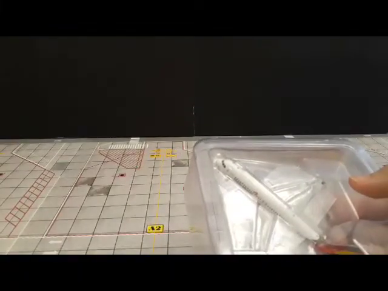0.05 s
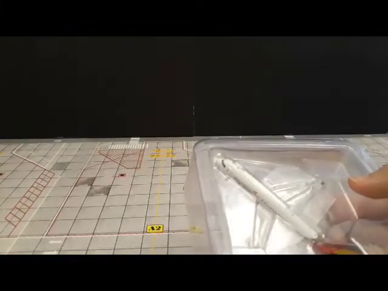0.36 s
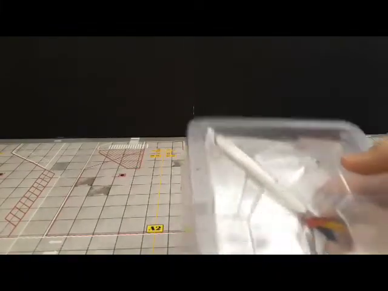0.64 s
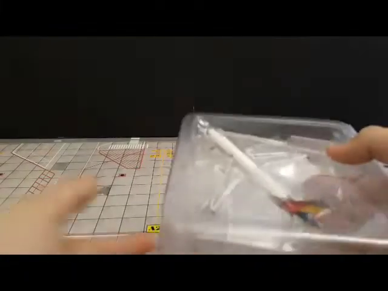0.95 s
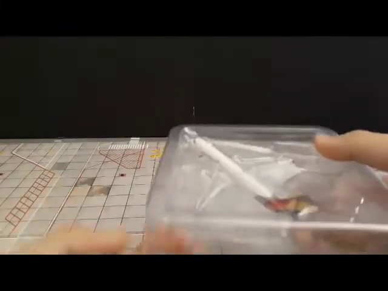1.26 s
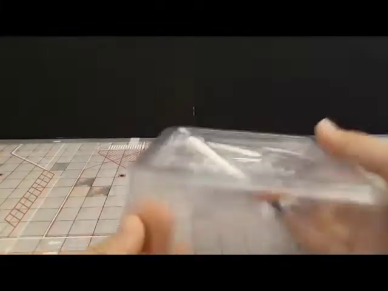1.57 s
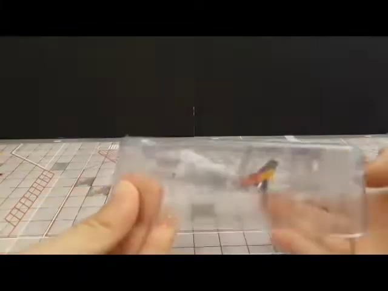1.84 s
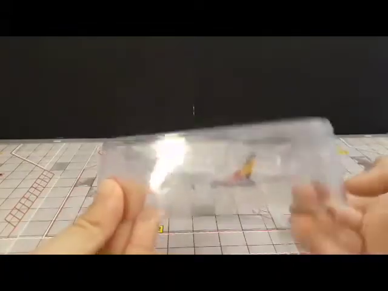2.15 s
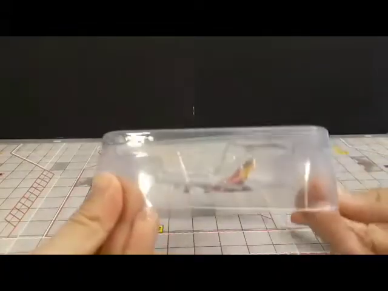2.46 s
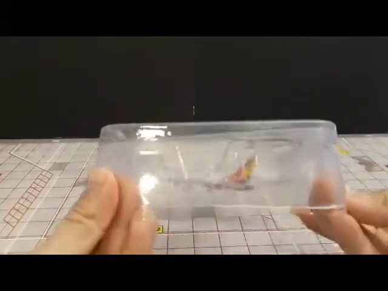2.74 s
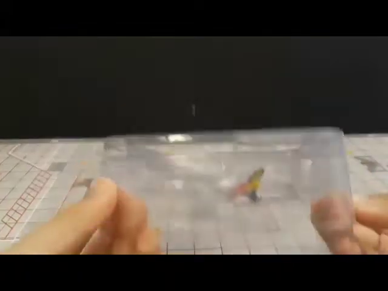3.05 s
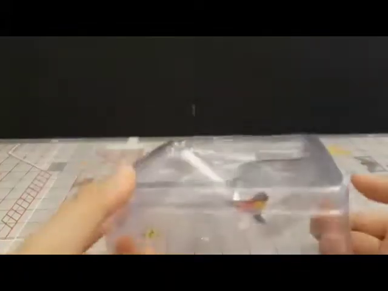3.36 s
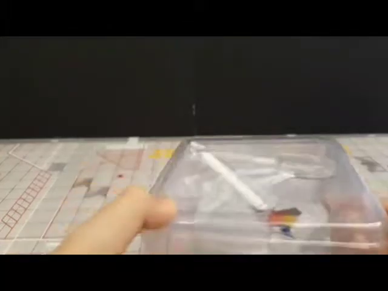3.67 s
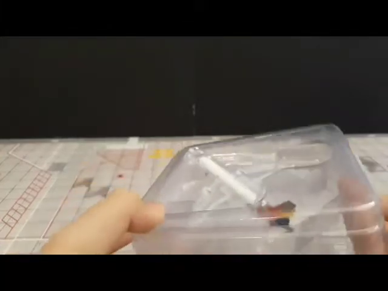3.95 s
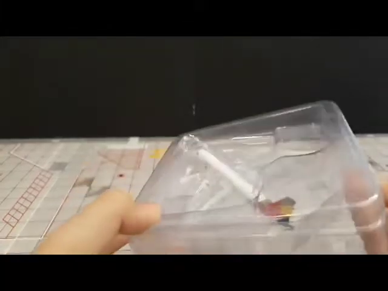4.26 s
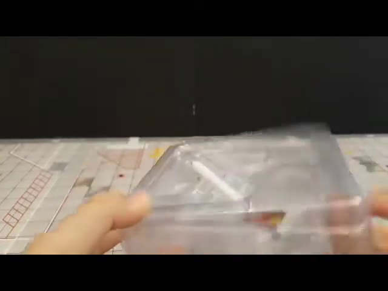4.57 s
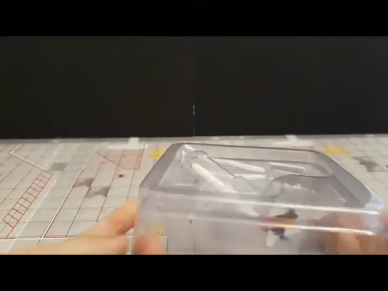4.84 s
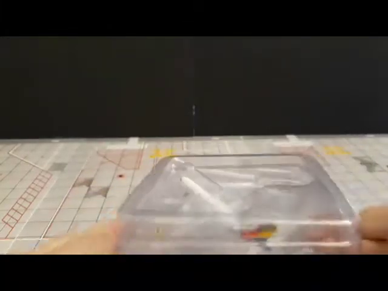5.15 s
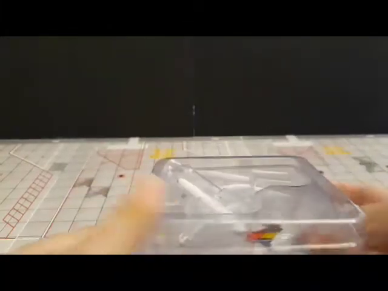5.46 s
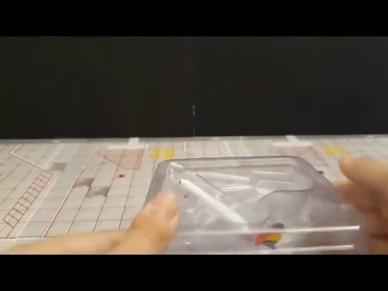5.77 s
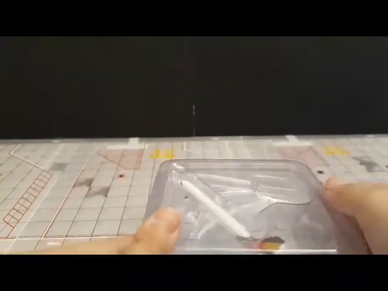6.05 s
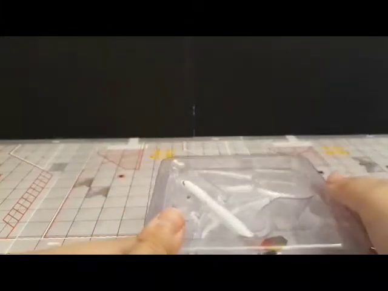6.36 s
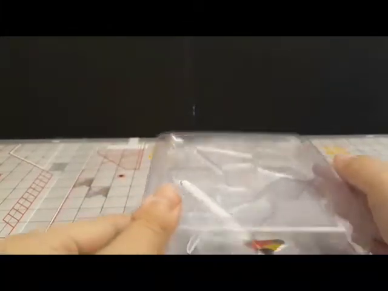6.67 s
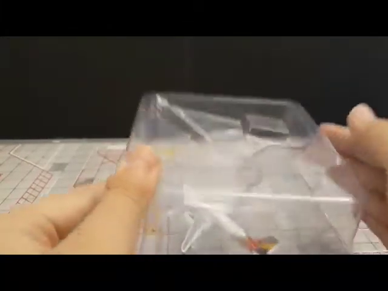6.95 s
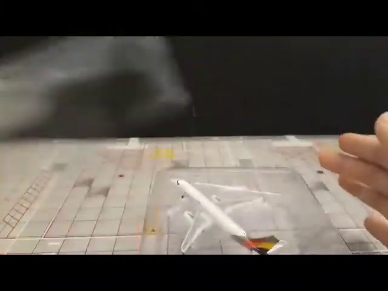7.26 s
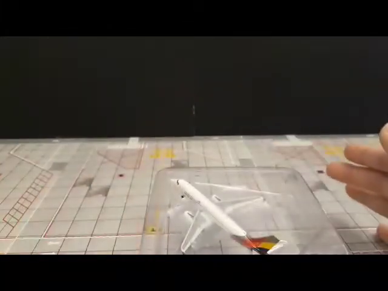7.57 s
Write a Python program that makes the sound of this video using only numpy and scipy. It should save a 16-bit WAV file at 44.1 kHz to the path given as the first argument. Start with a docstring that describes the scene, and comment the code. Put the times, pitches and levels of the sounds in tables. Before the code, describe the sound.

A thin plastic tray is handled close to the microphone, over faint room noise and a low hum, with a brief small-room echo. For the first 1.5 seconds there are light clicks, soft sliding hisses and faint, thin whistles. Sharper dry snaps come at about 1.6, 1.9 and 2.3 seconds. Near 2.9 seconds a loud cluster of cracks rings briefly as the rim springs free. Smaller crackles follow around 3.5 seconds, then scattered clicks and short scrapes from 4 to 5 seconds. From 5.2 seconds the two halves catch and slip in busier scrapes, snaps and hisses, peaking in loud, hollow cracks just after 6 seconds. A last run of scraping and snapping comes around 6.7 to 6.9 seconds. The lid slides off with a soft hiss from 7.1 to 7.5 seconds, leaving only the hum.

```python
"""First comes a low room noise with a faint hum, then the dry snaps of a plastic tray bent by hand.
Its thin walls snap as they buckle, and stiff parts spring free and ring. Between the snaps come soft
sliding hisses and faint, thin, high whistles. As the two halves are pulled apart, they catch and
slip in short scrapes. The desk and the walls of the small room add a brief echo."""
import sys
import numpy as np
from scipy import signal
from scipy.fft import rfft, irfft
from scipy.io import wavfile
from scipy.ndimage import uniform_filter1d

SR = 44100
rng = np.random.default_rng(int(sys.argv[2]) if len(sys.argv) > 2 else 0)


def inscribe(sig):
    """Save sig as 16-bit PCM at rate SR to the path in sys.argv[1].

    A 1-D sig is mono; a 2-D sig holds one channel per row.
    Samples are clipped to [-1, 1] before scaling.
    """
    pcm = np.round(np.clip(np.atleast_2d(sig).T, -1, 1) * 32767)
    wavfile.write(sys.argv[1], SR, pcm.astype(np.int16))


N = 344421


def from_db(db):
    """Turn decibels into a number to multiply a sound by."""
    return 10 ** (np.asarray(db) / 20)


def rms_one(x):
    """Scale a sound so that its average size (rms) is one."""
    return x / np.sqrt(np.mean(x ** 2) + 1e-20)


def at_hz(points, hz):
    """Read between the rows of a table, with pitch counted in octaves."""
    pitches, values = np.transpose(points)
    return np.interp(np.log(np.maximum(hz, 1)), np.log(pitches), values)


def band_pass(low_hz, high_hz):
    """A gentle filter that keeps the sound between two pitches."""
    return signal.butter(2, [low_hz, high_hz], "band", fs=SR, output="sos")


def add(track, start, sound):
    """Mix a sound into the track, starting at a time in seconds."""
    i = max(round(start * SR), 0)
    part = sound[:max(N - i, 0)]
    track[i:i + len(part)] += part


# The tone of the room noise: (pitch [Hz], relative level [dB])
ROOM_NOISE = [(15, -41), (25, -31), (49, -5.5), (122, -2), (148, -3.5), (193, -1.5), (359, -5),
              (582, -12.5), (631, -11.5), (684, -15.5), (871, -17), (1380, -20), (2060, -20.5), (7910, -31),
              (15500, -31.5)]
# The noise that differs between left and right: (pitch [Hz], level against the shared noise [dB])
SIDE_NOISE = [(60, -35), (110, -26), (200, -27.5), (380, -21.5), (700, -12.5), (1290, -9.5), (2380, -8.5),
              (4400, -7), (8120, -15), (15000, -2)]
# The steady tones of the hum: (pitch [Hz], level [dB])
HUM_TONES = [(59.5, -78.5), (119, -73), (188.4, -87), (242, -75), (360.5, -75)]

def background(noise_db=-62.5):
    """Both ears share a low room noise and a mains hum; a thin hiss differs between them."""
    hz, t = np.arange(N // 2 + 1) * SR / N, np.arange(N) / SR
    shared, side = rfft(rng.standard_normal((2, N))) * from_db(at_hz(ROOM_NOISE, hz))
    side = irfft(side * from_db(at_hz(SIDE_NOISE, hz)), N)
    noise = from_db(noise_db) * rms_one(irfft(shared, N) + side * np.array([[1], [-1]]))
    hum = sum(from_db(db) * np.sin(2 * np.pi * (f * t + rng.random())) for f, db in HUM_TONES)
    return noise + np.sqrt(2) * hum


# The tray's own notes; fade time is how long a 60 dB drop takes:
# (pitch [Hz], relative level [dB], fade time [s])
TRAY_NOTES = [(183, -11, 0.038), (297, -7.5, 0.045), (343, -9.5, 0.021), (558, -4, 0.017),
              (743.5, -1.5, 0.028), (866, -3.5, 0.049), (1139, 0.5, 0.017), (1352, -6, 0.025),
              (1803, -0.5, 0.011), (2400, -7.5, 0.022), (2950, -1, 0.0031), (4340, -9, 0.0018),
              (6400, -11, 0.0067), (8500, -6.5, 0.0016), (9700, -19, 0.00053)]

def tray(force, spread_db, detune, click_db, blur_db=1.0, blur_fade_s=0.017, blur_top_hz=6000):
    """A push makes the tray ring; each touch and grip shifts the level and pitch of its notes a bit."""
    t = np.arange(SR // 20) / SR
    hz, db, fade_s = np.transpose(TRAY_NOTES)[:, :, None]
    strength, bend, direction = rng.standard_normal((3, len(TRAY_NOTES), 1))
    fade = from_db(db + spread_db * strength - 60 * t / fade_s)
    notes = np.sign(direction) * fade * np.sin(2 * np.pi * hz * (1 + detune * bend) * t)
    # countless weak notes of the ribbed walls blur into a short noisy tail
    blur = from_db(blur_db - 60 * t / blur_fade_s) * rng.standard_normal(len(t))
    blur[0] += from_db(click_db)  # the bare click of the touch
    soften = signal.butter(1, blur_top_hz, fs=SR, output="sos")
    return signal.fftconvolve(force, notes.sum(axis=0) + signal.sosfilt(soften, blur))


# The borders of five pitch bands, called thump, body, clack, crack and fizz: (pitch [Hz])
BAND_EDGES = [130, 500, 1400, 3200, 7500, 14000]

def shape_tone(sound, tone_db, touch, main_part, pivot_hz=1450, wall_hz=2010, wall_octaves=1.02):
    """Set the five band levels: a sharp touch adds treble, one near a flat wall's middle adds clack."""
    strength_db, brightness, clack_db = touch
    out = 0
    for k, (low, high) in enumerate(zip(BAND_EDGES, BAND_EDGES[1:])):
        hz = np.sqrt(low * high)
        wall = np.exp(-(np.log2(hz / wall_hz) / wall_octaves) ** 2)
        db = tone_db[k] + strength_db + brightness * np.log2(hz / pivot_hz) + clack_db * wall
        band = signal.sosfilt(band_pass(low, high), sound)
        size = np.sqrt(np.mean(band[main_part] ** 2) + 1e-20)
        out = out + (-1) ** k * band * from_db(db) / size  # flip every other band so they join up
    return out


# The tone all snaps share, one value a band from thump to fizz: (relative level [dB])
SNAP_TONE = [-6.5, -1.75, -5, -11, -14.5]
# Each time a wall buckles: (time [s], strength [dB], brightness [dB per octave], wall clack [dB])
BUCKLES = [(0.3546, -54.5, -1.7, 1.0), (0.8196, -59, 1, 2), (0.9117, -70.5, 4.5, 6.5),
           (1.0845, -66, 6.5, 7), (1.0935, -64, 5, 12.0), (1.1115, -57, 1, 3.0), (1.271, -61, -1.5, 3),
           (1.4262, -54.5, 1.4, -7.5), (1.4952, -53.5, -2, 4), (1.6231, -43, -0.7, -0.5),
           (1.633, -54.4, -2.8, 2), (1.6571, -57, -2.5, -1), (1.9, -39, 0.5, -10.5),
           (1.9646, -57.5, -1, 1.0), (1.9786, -57, -2, 6), (2.122, -60, 1, 1.0), (2.3075, -52.5, 0.5, -9.0),
           (2.318, -38.5, -1.8, 1), (2.328, -56, -1.5, 3), (2.4403, -62, -1.2, 3.0), (2.6385, -52, -1, -3),
           (2.7634, -53.5, -2, -0.0), (2.8508, -33.4, -1.5, 9.5), (2.8605, -40.5, 1, 10.5),
           (2.8775, -35.7, -1.5, -3), (2.8815, -39.0, -2.2, 2), (2.9246, -32.6, 0, -12),
           (2.929, -37, -3.3, -14), (2.9363, -37, -1.6, 13.5), (3.0854, -47.5, 0.4, 9.5),
           (3.1163, -52.5, 0, 0), (3.1324, -51.5, 0.2, -7), (3.1439, -49.5, 0.3, -9),
           (3.2002, -53.5, 0, -5.0), (3.2107, -55.5, 0.8, 0), (3.4553, -42.5, 2.5, -5),
           (3.4705, -43.5, 2.2, -6), (3.4805, -43.5, 1, -7), (3.4939, -48.5, 3, -2), (3.5332, -54, -1.7, 7),
           (3.5615, -48, -0.1, 3.5), (3.6384, -50.8, -1.5, 3), (3.6527, -53.8, 1.4, 6.5),
           (3.7401, -63, 0.3, 7.5), (3.7963, -61, 2.5, 10), (3.8734, -57, 1.5, 5.5),
           (3.9697, -51.0, -0.1, 0.5), (4.0082, -42.5, -0.3, 3.5), (4.6378, -54.5, -2.5, -8),
           (4.7627, -47.5, 0.5, -6.5), (4.7845, -44.3, -2, -9.5), (4.8282, -57.5, -4.5, -12),
           (4.872, -52.5, -0.5, -9), (5.2122, -52, 1.2, 3.0), (5.2398, -52.5, 0.8, 5.5),
           (5.2976, -48.5, -4.5, -5), (5.3427, -41, 0.6, 5.5), (5.4195, -49.5, -1, 10),
           (5.6549, -51.5, -2, -16), (5.6887, -53, -1, -4), (5.7126, -48, 3.5, -15),
           (5.8315, -35.9, -0.9, -17), (5.8405, -49, -2, -2), (6.0296, -33, 0.2, -2),
           (6.0451, -37, -0.3, -2), (6.0975, -52.5, 3.2, -7.0), (6.127, -37, 0.3, -3),
           (6.1399, -35.5, -0.5, -5.5), (6.2108, -48.5, 0, 8), (6.232, -46, 0.6, 1.0),
           (6.243, -50, -0.5, -2), (6.26, -50, -2.1, -1), (6.3078, -45, 2.3, -4), (6.5423, -52, -0.7, -5.5),
           (6.6143, -53, -1.5, -5.5), (6.6722, -56, -1.5, -3), (6.7107, -44.5, -1.1, 4.0),
           (6.7373, -39, 1.6, -6.5), (6.8425, -50, 2, 3), (6.859, -50.5, -1, 2), (7.1354, -72.5, 4, 12.5)]

def snaps(rows, creak_db=-25.0, settle_db=-14.5, settle_fade_s=0.014):
    """A wall creaks for an instant, buckles with one jolt, and settles with tiny creases."""
    lead = SR // 400  # samples of creak before the jolt
    out, t = np.zeros(N), np.arange(-lead, SR // 80) / SR
    strain = from_db(np.where(t < 0, creak_db, settle_db - 60 * t / settle_fade_s))
    main_part = slice(lead // 2, lead // 2 + SR // 125)
    for time, *touch in rows:
        force = strain * rng.standard_normal(len(t)) * (rng.random(len(t)) < .3)
        force[lead] = 1  # the jolt
        ring = tray(force, spread_db=1.0, detune=0.089, click_db=18.0)
        add(out, time - lead / SR, shape_tone(ring, SNAP_TONE, touch, main_part))
    return out


def swell(length, edge_db, peak_share=0.36):
    """A curve that rises to a peak, eases off and ends softly."""
    along = np.linspace(0, 1, int(length * SR))
    curve = from_db(np.interp(along, [0, peak_share, 1], [edge_db, 0, edge_db]))
    return curve * signal.windows.tukey(len(along), .15)


# Soft sliding hisses (wide rows) and faint, thin, high whistles (narrow rows):
# (start [s], length [s], middle pitch [Hz], width [octaves], relative level [dB])
HISSES_AND_WHISTLES = [(.44, 0.041, 10700, .1, -66), (0.434, 0.29, 4970, 2, -60),
                       (0.604, 0.052, 3900, 0.44, -58), (0.673, .11, 6370, .26, -65.5),
                       (0.973, .1, 6800, .24, -67), (1.017, 0.093, 6000, 2.7, -56.5),
                       (1.03, 0.46, 4280, 1.4, -69), (5.06, 0.29, 4700, 1.86, -58.5),
                       (5.203, 0.57, 4800, 0.91, -61), (5.36, 0.35, 10000, 1.7, -66.5),
                       (7.147, .16, 2930, 0.94, -62.5), (7.306, .14, 3860, 2.9, -55.5),
                       (7.388, 0.18, 6400, .19, -66)]

def hisses_and_whistles(grain_db=2.5, boost_db=0.5):
    """Grainy noise swells and fades: a wide band is a sliding hiss, a narrow one a thin whistle."""
    out = np.zeros(N)
    for start, length, hz, octaves, db in HISSES_AND_WHISTLES:
        loudness = swell(length, edge_db=-14.0)
        grain, noise = rng.standard_normal((2, SR))[:, :len(loudness)]
        half_width = 2 ** (octaves / 2)
        band = signal.sosfilt(band_pass(hz / half_width, hz * half_width), noise)
        flicker = from_db(grain_db * rms_one(uniform_filter1d(grain, size=130)))
        add(out, start, from_db(db + boost_db) * loudness * rms_one(band * flicker))
    return out


# Each time a stiff face or rim springs free:
# (time [s], middle pitch [Hz], width [octaves], level [dB], fade time [s])
RIM_RINGS = [(1.0822, 3800, 1.0, -54, .02), (1.0859, 4030, 1.1, -44, 0.019),
             (1.0931, 4020, 1.2, -43.5, .018), (2.853, 1890, 0.54, -43, .22),
             (2.94, 1810, 0.39, -43.5, .26), (3.516, 1180, .3, -55, .06), (3.574, 1215, .3, -55, 0.053),
             (3.639, 880, 0.27, -53, .04), (3.663, 1230, 0.33, -55.5, 0.053),
             (5.298, 870, 0.45, -50, 0.059), (6.03, 1794, 0.37, -39.5, 0.14), (6.045, 1130, 0.29, -36, .08)]

def rim_rings(note_count=16):
    """A freed face or rim rings with many close notes: a hollow sound that wavers and dies quickly."""
    out, t = np.zeros(N), np.arange(SR // 3) / SR
    for time, hz, octaves, db, fade_s in RIM_RINGS:
        pitches = hz * 2 ** (octaves * rng.uniform(-.5, .5, (note_count, 1)))
        notes = np.sqrt(2 / note_count) * np.sin(2 * np.pi * pitches * t).sum(axis=0)
        add(out, time, from_db(db - 60 * t / fade_s) * notes)
    return out


HELD_FROM_S, HELD_UNTIL_S = 1.1, 6.95  # the tray is held in both hands

def creases(ticks_per_s=60, level_db=-73.0, uneven_db=1.5):
    """While the tray is held, its strained walls tick faintly at random."""
    t = np.arange(N) / SR
    held = (t > HELD_FROM_S) & (t < HELD_UNTIL_S)
    ticks = (rng.random(N) < ticks_per_s / SR) * held
    sizes = from_db(uneven_db * np.minimum(rng.exponential(1, N), 3))
    ring = tray(ticks * sizes, spread_db=2.0, detune=.03, click_db=0.0)
    return from_db(level_db) * rms_one(ring[:N])


def grip_snaps(snaps_per_s=3.1, strength_db=-61.5, spread_db=1, brightness_spread=1.2, count=64):
    """The shifting grip sets off small snaps at random while the tray is held."""
    times = HELD_FROM_S + np.cumsum(rng.exponential(1, count)) / snaps_per_s
    size, sharpness = rng.standard_normal((2, count))
    strengths = strength_db + spread_db * size
    rows = np.column_stack([times, strengths, brightness_spread * sharpness, np.zeros(count)])
    return snaps(rows[times < HELD_UNTIL_S])


# The tone all scrapes share, one value a band from thump to fizz: (relative level [dB])
SCRAPE_TONE = [-6, -1.5, -5.5, -12.5, -16]
# Each time the two halves rub:
# (start [s], length [s], strength [dB], brightness [dB per octave], wall clack [dB])
RUBS = [(2.611, 0.046, -58.5, 3.0, 1.5), (2.841, 0.013, -47, 0, 3), (2.863, 0.052, -51, 0.8, 11.5),
        (2.933, 0.036, -47, -3.5, -5), (3.458, 0.058, -52.5, -1, 1.5), (4.186, 0.058, -46.5, 0, -6.0),
        (4.242, 0.059, -58, 0.1, -3.0), (4.61, 0.16, -57.5, 1.2, -9), (4.783, 0.11, -58, 0, -6),
        (5.205, 0.1, -56.5, -0.5, -2), (5.323, 0.039, -44.5, 1.7, 5), (5.366, 0.052, -45, -0.6, -18),
        (5.398, 0.033, -42, 1.2, 0.5), (5.45, 0.093, -52.5, -0.6, 4), (5.534, 0.129, -54, 1.3, -5.5),
        (5.691, 0.055, -50, 0.4, -6.0), (5.746, 0.029, -43.5, 2, 1.5), (6.02, 0.02, -44.5, 1, 5),
        (6.038, 0.055, -44, -1.1, -1), (6.195, 0.09, -51, 0, -0.5), (6.3, 0.029, -45.5, 1.2, -10),
        (6.343, 0.07, -55.5, -0.8, -0.5), (6.414, 0.082, -59.5, -1.5, 0.5),
        (6.731, 0.031, -40.5, 1.2, -3.5), (6.755, 0.034, -42.5, -0.5, -2), (6.778, 0.052, -45, 0.1, 2.5),
        (6.809, 0.071, -48.5, -0.8, 1), (6.888, 0.092, -67, -4, -5)]

def scrapes(peak_slips_per_s=750, jitter=.45, uneven_db=4.5, hiss_db=-17.5):
    """Ribs catch and slip: an uneven run of small jolts that speeds up as the rub presses harder."""
    out = np.zeros(N)
    for start, length, *touch in RUBS:
        pressure = swell(length, edge_db=-15.0)
        n = len(pressure)
        gap, size, hiss = rng.standard_normal((3, SR // 4))
        travel = np.cumsum(peak_slips_per_s * np.sqrt(pressure)) / SR
        slip_at = np.searchsorted(travel, np.cumsum(np.exp(jitter * gap)))
        inside = slip_at < n
        force = from_db(hiss_db) * hiss[:n]
        force[slip_at[inside]] += from_db(uneven_db * np.clip(size[inside], -2, 2))
        ring = tray(force * pressure, spread_db=0.5, detune=0.096, click_db=18.5, blur_db=-7.0)
        add(out, start, shape_tone(ring, SCRAPE_TONE, touch, main_part=slice(n // 6, 2 * n // 3)))
    return out


# How long the room rings: (pitch [Hz], fade time [s])
ECHO_FADES = [(150, 0.31), (700, 0.28), (2000, 0.31), (6000, 0.44), (15000, .18)]
# How strongly the room answers a sound: (pitch [Hz], relative level [dB])
ECHO_LEVELS = [(150, -5), (700, -11.5), (1900, -10), (3200, -11), (6000, -9), (15000, -15)]

def room(sound, first_echo_s=0.0028, build_s=0.0044):
    """Echoes from the desk and walls build up, then die away, the very highest pitches first."""
    t = np.arange(SR // 2) / SR
    onset = np.clip((t - first_echo_s) / build_s, 0, 1) ** .5
    edges, response = np.geomspace(110, 16000, num=11), 0
    for low, high in zip(edges, edges[1:]):
        hz = np.sqrt(low * high)
        fade = onset * from_db(-60 * t / at_hz(ECHO_FADES, hz))
        echoes = rng.standard_normal(len(t)) * fade / np.sqrt(np.sum(fade ** 2))
        band = signal.sosfilt(band_pass(low, high), echoes)
        response = response + from_db(at_hz(ECHO_LEVELS, hz)) * band
    return signal.fftconvolve(sound, response)[:N]


def scene(direct_db=-1.0):
    """The tray is close and central; its sides send other tones into the room than its front."""
    front, left, right = [snaps(BUCKLES) + scrapes() for _ in range(3)]
    shared = hisses_and_whistles() + rim_rings() + creases() + grip_snaps()
    echoes = (room(left + shared) + room(right + shared)) / np.sqrt(2)
    return from_db(direct_db) * (front + shared) + echoes + background()


def record(dry, cutoff_hz=15700):
    """A steep filter cuts off the very highest pitches."""
    return signal.sosfilt(signal.ellip(10, .2, 70, cutoff_hz, fs=SR, output="sos"), dry)


dry = scene()
out = record(dry)
inscribe(out)
```